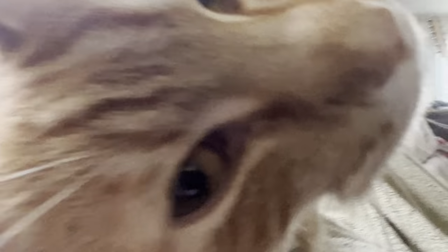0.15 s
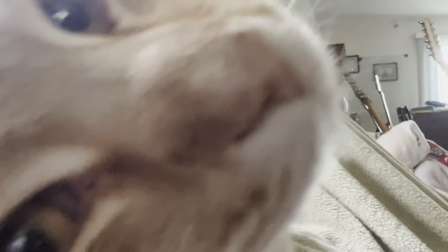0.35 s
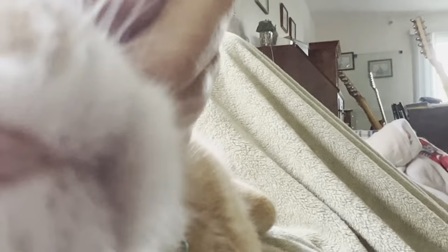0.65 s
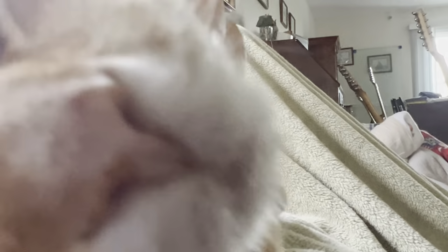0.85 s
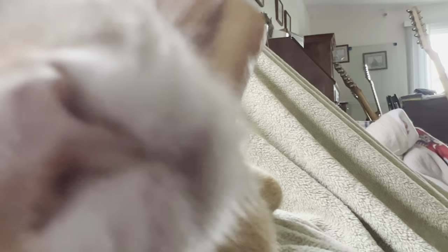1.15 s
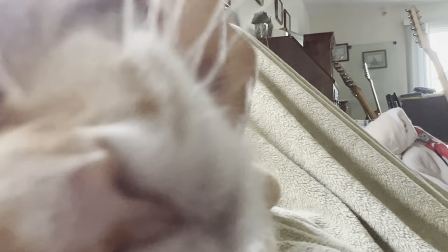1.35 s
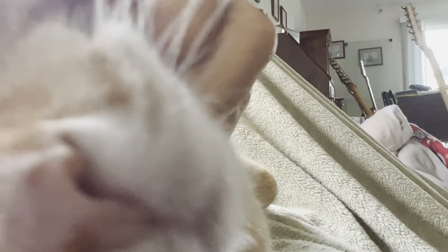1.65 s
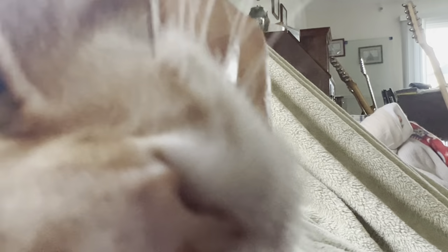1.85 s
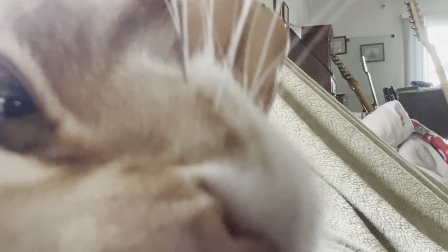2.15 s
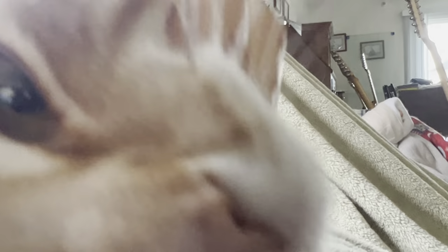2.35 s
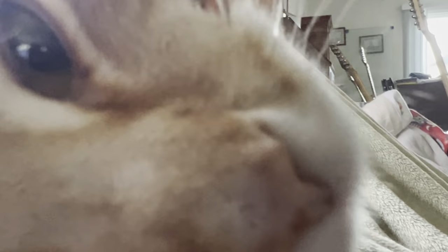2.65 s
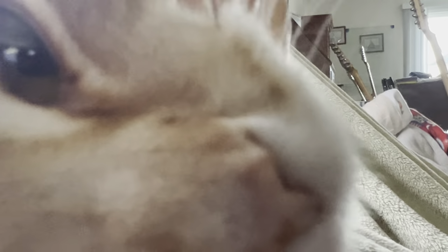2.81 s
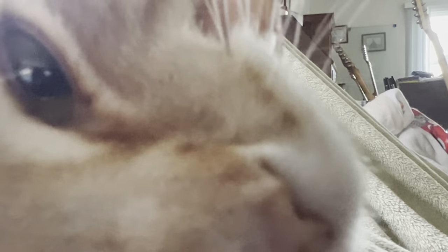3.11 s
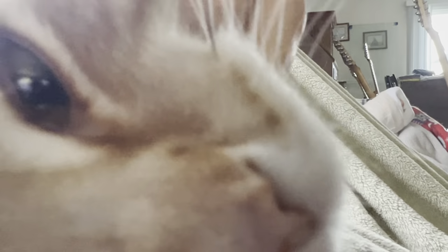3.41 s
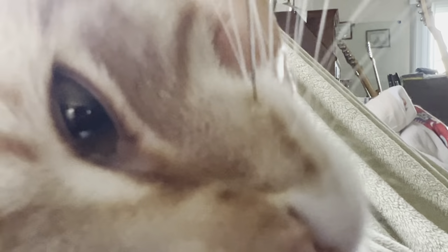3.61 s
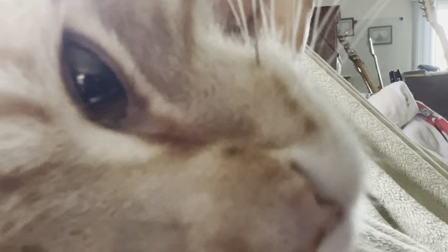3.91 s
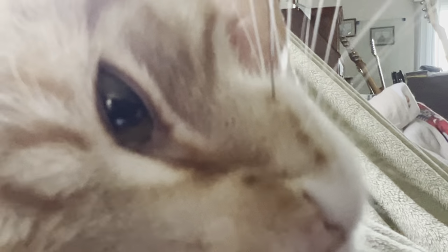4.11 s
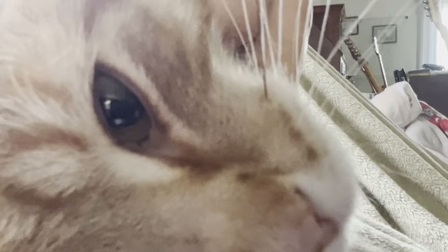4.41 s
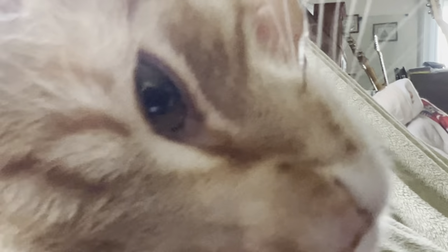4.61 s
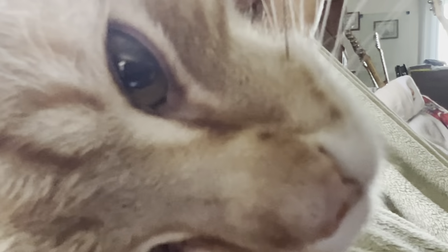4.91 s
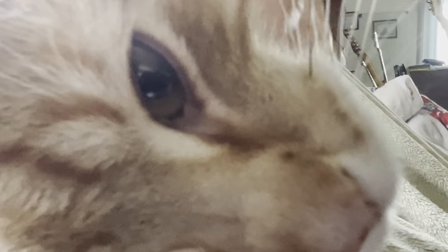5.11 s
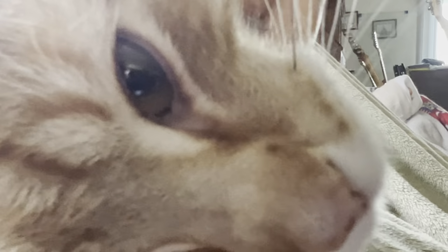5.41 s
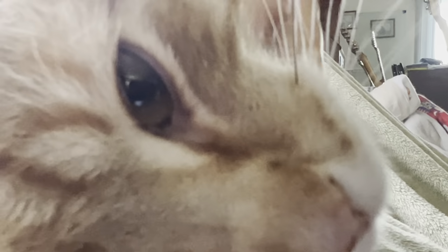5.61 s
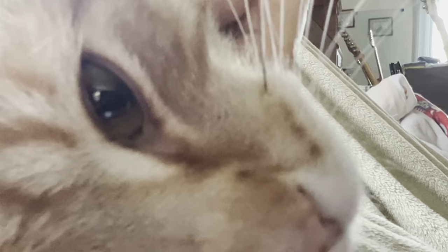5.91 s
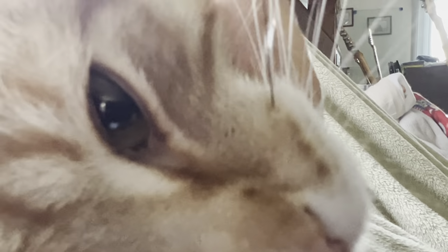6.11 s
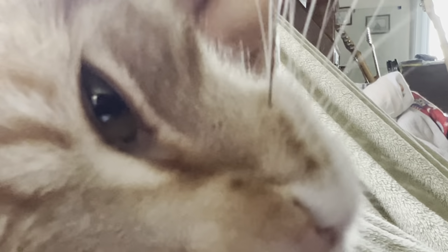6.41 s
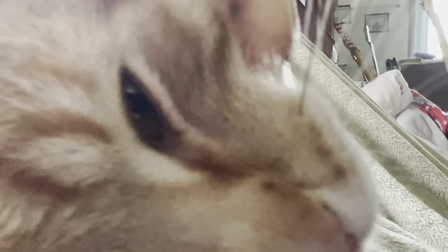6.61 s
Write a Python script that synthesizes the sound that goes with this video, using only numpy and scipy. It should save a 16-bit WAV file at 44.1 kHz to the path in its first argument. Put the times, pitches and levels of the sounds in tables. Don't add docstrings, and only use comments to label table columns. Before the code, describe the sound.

Very close cat purring: a low fluttering throb swells into raspy trills five times, with rapid nostril sniffs and faint room rumble.

```python
import sys
import numpy as np
from scipy import signal
from scipy.fft import rfft, irfft, next_fast_len
from scipy.io import wavfile

SR = 44100
rng = np.random.default_rng(int(sys.argv[2]) if len(sys.argv) > 2 else 0)


def nominal_scale(level):
    x = np.asarray(level, float) / 20
    return 10 ** x


def master(y):
    cut = np.clip(np.atleast_2d(y).T, -1, 1)
    pcm = np.round(cut * 32767)
    wavfile.write(sys.argv[1], SR, pcm.astype(np.int16))


N = 297675
PADDED = next_fast_len(N + 4096)
BINS = np.maximum(np.arange(PADDED // 2 + 1) * SR / PADDED, 1)


def rms_one(x):
    return x / np.sqrt(np.mean(x ** 2) + 1e-20)


def in_time(rows):
    s, *columns = np.transpose(rows)
    return [np.interp(np.arange(N) / SR, s, c) for c in columns]


def at_hz(points, hz):
    points_hz, points_db = np.transpose(points)
    return np.interp(np.log(hz), np.log(points_hz), points_db)


def shaped(x, response):
    return irfft(rfft(x, PADDED) * response, PADDED)[..., :N]


def coloured(spectrum):
    return rms_one(shaped(rng.standard_normal(N), nominal_scale(at_hz(spectrum, BINS)) * (BINS > 20)))


def drift(rate_hz):
    return rms_one(shaped(rng.standard_normal(N), 1 / (1 + (BINS / rate_hz) ** 2)))


def resonance(x, hz, width_hz):
    r = np.exp(-np.pi * width_hz / SR)
    poles = [1, -2 * r * np.cos(2 * np.pi * hz / SR), r * r]
    return signal.lfilter(np.array([1, 0, -1]) * (1 - r * r) / 2, poles, x + 1e-18)


def gliding(x, hz, width_hz):
    carrier = np.exp(2j * np.pi * np.cumsum(hz) / SR)
    r = np.exp(-np.pi * width_hz / SR)
    return 2 * np.real(carrier * signal.lfilter([(1 - r) ** 2], [1, -2 * r, r * r], x / carrier))


def ports(x, tilt):
    # (frequency [Hz], left phase lead [rad])
    port_lead = [(0, 0), (120, .25), (350, .42), (1300, .55), (4000, .5), (6500, 0), (8400, -1.3),
                 (10000, -3.14), (13400, -6.28), (15700, -8.7)]
    lead_rad = np.interp(BINS, *np.transpose(port_lead))
    half = nominal_scale(at_hz(tilt, BINS) / 2) * np.exp(.5j * lead_rad)
    return shaped(x, np.array([half, 1 / half]))


def diffuse(spectrum):
    # (frequency [Hz], side minus mid [dB])
    side_spread = [(60, -13.5), (110, -17), (200, -14.5), (380, -7), (700, 0), (1290, -2.5), (2380, -2),
                   (4400, 2.5), (8120, 6), (15000, -14.5)]
    # (frequency [Hz], left minus right [dB])
    diffuse_tilt = [(60, 2), (200, 3), (500, 3), (1200, .5), (4000, 2.5), (12000, .1)]
    side = shaped(coloured(spectrum), nominal_scale(at_hz(side_spread, BINS)))
    return ports(coloured(spectrum), diffuse_tilt) + side * [[1], [-1]]


def folds():
    # (frequency [Hz], level [dB])
    overtone_levels = [(520, -16.5), (600, -9), (720, -1.5), (880, -4), (1100, -6), (1300, -18),
                       (1550, -69), (2050, -37), (2600, -44.5)]
    # (frequency [Hz], level [dB])
    nasal_passage = [(150, 16), (220, -2.5), (330, 2), (450, -3.5), (520, -16), (600, -45)]
    # (frequency [Hz], density [dB/Hz])
    rasp_spectrum = [(140, -23), (200, 0.5), (270, 9), (420, 7), (520, -17), (750, -3), (1150, -22.5),
                     (1450, -66), (2100, -52)]
    tail_ms, taut_hz, open_spread, longest_open_ms, rasp_db = 8.5, 410, .12, 22.5, -9
    low, high, puffs = np.zeros((3, N))
    wobble, shake, rasp, flutters = drift(100), drift(160), coloured(rasp_spectrum), throbs()
    chance = rng.standard_normal((len(flutters), 9))
    for (s, peak_db, open_ms, early_hz, late_hz, over_db), luck in zip(flutters, chance):
        open_ms = min(open_ms * np.exp(open_spread * luck[0]), longest_open_ms)
        shut = open_ms + 3.21
        end = shut + tail_ms
        ms = np.arange(round(end * SR / 1000)) * 1000 / SR
        start = round((s - .004) * SR)
        at = slice(start, start + len(ms))
        u = np.clip(ms / shut, 0, 1)
        slack = np.clip((taut_hz - min(early_hz, late_hz)) / 150, .08, 1)
        path_hz = [early_hz + 0.55 * max(taut_hz - early_hz, 0), early_hz * (1 - 0.2335 * slack),
                   late_hz * 1.086, late_hz * 0.64]
        hz = np.interp(ms, [0, 0.32 * shut, shut, end], path_hz) * (1 + 0.054 * slack * wobble[at])
        turn = 2 * np.pi * np.cumsum(hz) / SR
        soft = np.clip(np.minimum(ms, ms[-1] - ms) / 1.5, 0, 1)
        force = soft * nominal_scale(peak_db + 0.86 * slack * shake[at])
        body = force * np.interp(ms, [0, 0.17 * shut, .7 * shut, shut, shut + .5 * tail_ms, end],
                                 [0.26, 0.61, 1, 0.61, 0.29, 0.22])
        first = nominal_scale(at_hz(nasal_passage, hz)) * np.sin(turn)
        second = nominal_scale(at_hz(nasal_passage, 2 * hz) - 10.5) * np.sin(2 * turn - 1.5)
        low[at] += body * (first + second)
        snap = force * np.sin(np.pi * u ** .8) ** .5
        for k in range(2, 9):
            level_db = over_db - 3.0 + 0.32 * luck[k] + at_hz(overtone_levels, k * hz)
            high[at] += snap * nominal_scale(level_db) * np.sin(k * (turn - .4))
        high[at] += snap * nominal_scale(rasp_db) * slack ** 2 * min(open_ms / 20, 1) * rasp[at]
        puffs[at] += np.sin(np.pi * u) * np.exp(3 * (np.cos(turn) - 1))
    ringing = nominal_scale(-3.0) * low + nominal_scale(-9.5) * resonance(low, 430, 123)
    return ringing + high, puffs


def throbs():
    # (first throb [s], last throb [s], mid-swell hurry [ms], slack opening [ms],
    # overtone trim [dB])
    swells = [
        (0.366, 0.529, 1, 11, -7),
        (1.597, 1.885, 1.5, 15.9, 0.1),
        (2.853, 3.286, 4.5, 19, -4),
        (4.437, 4.761, -0.5, 13, -0.5),
        (5.939, 6.37, 6, 17, -0.5),
    ]
    # (time [s], peak level [dB], early pitch [Hz], late pitch [Hz])
    efforts = [
        [(.364, -32.5, 430, 424), (.526, -34.5, 436, 452)],
        [(1.597, -34, 388, 390), (1.628, -30, 386, 415.4), (1.66, -28, 296, 360), (1.74, -27, 346, 399),
         (1.788, -29, 328, 363), (1.82, -30.5, 387, 404), (1.885, -35, 466, 441)],
        [(2.852, -26.5, 389, 392), (2.88, -26.5, 272.3, 376), (2.947, -24.5, 247.9, 353),
         (3.067, -26.5, 260.8, 333), (3.159, -27, 256, 300), (3.19, -29, 277, 225),
         (3.287, -30.5, 276.6, 249.4)],
        [(4.434, -42, 457, 490), (4.5, -33, 362.5, 391), (4.6, -31.5, 321, 341), (4.632, -35.5, 411, 403),
         (4.695, -34, 356, 387), (4.727, -36, 422, 430), (4.761, -38, 450, 430)],
        [(5.94, -32, 381.2, 384), (5.967, -30, 281.3, 349), (6.03, -32.5, 258, 373), (6.09, -32, 250, 330),
         (6.13, -32, 275, 350), (6.21, -32, 272, 309), (6.3, -34, 252, 323), (6.371, -34.5, 330, 326)],
    ]
    run_ons = [2.975, 3.005, 3.067, 3.098, 5.968, 6.06]
    throb_s, rest_hz, sag_span_hz = .0316, 446, 166.3
    taut_open_ms, run_on_ms, run_on_db = 8.92, 7, -0.5
    tiring_share = .35
    taut_over_db, sag_over_db, glide_over_db = -5, -4.5, -4
    rows = []
    for (first, last, hurry_ms, slack_ms, trim_db), effort in zip(swells, efforts):
        u = np.linspace(0, 1, round((last - first) / throb_s) + 1)
        s = first + u * (last - first) - hurry_ms / 1000 * np.sin(np.pi * u)
        knots, *columns = np.transpose(effort)
        peak_db, early_hz, late_hz = [np.interp(s, knots, c) for c in columns]
        sag = np.clip((rest_hz - early_hz) / sag_span_hz, 0, 1)
        runs_on = np.abs(s[:, None] - run_ons).min(axis=1) < throb_s / 2
        open_ms = taut_open_ms + (slack_ms - taut_open_ms) * sag
        open_ms = open_ms * (1 - tiring_share * sag * u ** 3) + run_on_ms * runs_on
        over_db = taut_over_db + (sag_over_db + trim_db) * sag + glide_over_db * (late_hz - early_hz) / 100
        rows += zip(s, peak_db + run_on_db * runs_on, open_ms, early_hz, late_hz, over_db)
    return rows


def chest(throb, order_db):
    # (multiple of throb rate [1], level [dB])
    chest_orders = [(1, -11), (2, 0), (3, -11), (4, -13), (5, -14.5)]
    return sum(nominal_scale(order_db + 3.0 + db + 1.0 * drift(7.2)) * np.sin(k * throb) for k, db in chest_orders)


def purring():
    # (start [s], end [s], throb rate [Hz], second-order level [dB],
    # body rumble [dB])
    purrs = [(-.1, 0.11, 30.4, -56, -64), (0.3, 0.663, 30.23, -62.5, -53.5),
             (0.939, 1.241, 28.55, -50.5, -61), (1.507, 1.949, 30.27, -49, -52),
             (2.118, 2.321, 28.46, -55.5, -60), (2.406, 2.622, 28.84, -53.5, -57.5),
             (2.828, 3.24, 32.99, -42, -47.5), (3.541, 4.096, 28.46, -56.5, -58.5),
             (4.443, 4.774, 30.03, -53.5, -53), (4.928, 5.62, 29, -58.5, -60.5),
             (5.854, 6.431, 32.76, -50, -53.5), (6.474, 6.667, 28.3, -65.5, -62)]
    swing_s, arch_db = 0.0896, 5
    pause_hz, pause_db, pause_rumble_db = 30.6, -64.5, -61.5
    t = np.arange(N) / SR
    rate_hz, order_db, rumble_db = np.outer([pause_hz, pause_db, pause_rumble_db], np.ones(N))
    for start, end, hz, db, body_db in purrs:
        on = np.clip(np.minimum(t - start, end - t) / swing_s + 1, 0, 1)
        edge_db = arch_db * np.interp((t - start) / (end - start), [0, 0.5, 1], [1, 0, 1]) ** 2
        rate_hz = rate_hz + on * (hz - pause_hz)
        order_db = order_db + on * (db - edge_db - pause_db)
        arched_db = np.maximum(body_db - edge_db, min(body_db, pause_rumble_db))
        rumble_db = rumble_db + on * (arched_db - pause_rumble_db)
    return rate_hz, order_db, rumble_db


def throat_air(whistle_hz, upper_hz, whistle_db, air_db, puffs, throb):
    # (resonance [Hz], width [Hz], level [dB])
    throat = [(2030, 420, 4.5), (5160, 720, -4.5), (7250, 1640, -3.5)]
    breath = rng.standard_normal(N) * (0.53 + 1.66 * puffs)
    steady = sum((-1) ** k * nominal_scale(db) * resonance(breath, hz, width)
                 for k, (hz, width, db) in enumerate(throat))
    air = rms_one(steady + nominal_scale(2.5) * gliding(breath, upper_hz, 470))
    pulsed = rng.standard_normal(N) * np.exp(.8 * np.cos(throb))
    whistle = gliding(pulsed, whistle_hz, 380)
    return nominal_scale(air_db - 10) * air + nominal_scale(whistle_db - 10) * rms_one(whistle)


def passage():
    # (opens [s], lowest whistle [s], closes [s], opening pitch [Hz],
    # whistle level [dB])
    passages = [
        (0.312, .4, 0.69, 3000, -70.5),
        (1.58, 1.74, 1.91, 3340, -67.5),
        (2.872, 3.222, 3.27, 3330, -67),
        (4.442, 4.63, 4.79, 3440, -75),
        (5.912, 6.192, 6.45, 3220, -71.5),
    ]
    opening_s, closing_s, shut_db, fade_db = .07, 0.086, -100, 4.5
    sag_s, lowest_hz, recover_hz_per_s = 0.18, 2924, 1200
    air_opening_s, air_closing_s, air_shut_db, air_over_db = 0.18, 0.023, -93, 4.5
    pitch, level, air = [], [], []
    for opens, lowest, closes, hz, db in passages:
        shut = closes + closing_s
        pitch += [(opens, hz), (max(opens, lowest - sag_s), hz), (lowest, lowest_hz),
                  (shut, lowest_hz + recover_hz_per_s * (shut - lowest))]
        level += [(opens - opening_s, shut_db), (opens, db), (lowest, db),
                  (closes, db - fade_db), (shut, shut_db)]
        air += [(opens - air_opening_s, air_shut_db), (opens + 0.054, db + air_over_db),
                (closes, db + air_over_db), (closes + air_closing_s, air_shut_db)]
    hz, = in_time(pitch)
    upper_hz = 3810 + 0.75 * (hz - lowest_hz)
    return hz, upper_hz, in_time(level)[0], in_time(air)[0]


def pops():
    # (time [s], peak level [dB], pitch [Hz], t60 [s])
    fold_pops = [
        (0.310, -38, 275, 0.021),
        (2.756, -53.5, 673, 0.039),
        (2.786, -51, 765, 0.025),
        (2.818, -35.5, 660, 0.0054),
        (2.833, -27.5, 223, 0.019),
        (3.313, -50, 310, 0.036),
        (4.402, -63, 528, 0.031),
        (5.872, -61.5, 698, 0.028),
        (5.902, -48.5, 631, 0.01),
        (5.917, -45, 266, 0.059),
    ]
    out = np.zeros(N)
    for s, peak_db, hz, t60 in fold_pops:
        t = np.arange(round(1.2 * t60 * SR)) / SR
        decay = nominal_scale(peak_db + 8.5 - 60 * t / t60)
        knock = np.sin(2 * np.pi * hz * t) * decay * (1 - np.exp(-t * hz * 2))
        out[round(s * SR):][:len(t)] += knock
    return out


def sniffs(flow_db):
    # (frequency [Hz], density [dB/Hz])
    nostril = [(900, -11.5), (2000, -8.5), (4000, -8.5), (6500, -8.5), (8500, -3), (9500, -6.5),
               (10500, -3.5), (11500, 1), (13000, -3), (15500, -2.5)]
    return nominal_scale(flow_db + 5.5 + 0.77 * drift(25)) * coloured(nostril)


def nostril_flow(air_db):
    # (start [s], crest [s], crest level [dB])
    sniff_strokes = [(.15, .21, -80.5), (0.384, 0.593, -68.5), (0.695, 0.795, -72), (.92, 0.965, -69.5),
                     (1.097, 1.216, -71), (1.311, 1.377, -69), (1.69, 1.783, -72.5), (1.932, 2.01, -68.5),
                     (2.13, 2.231, -72.5), (2.312, 2.376, -69), (2.517, 2.602, -75), (2.68, 2.862, -68.5),
                     (2.99, 3.083, -71), (3.22, 3.297, -67.5), (3.462, 3.53, -70), (3.647, 3.749, -71),
                     (3.932, 4.008, -74.5), (4.178, 4.288, -75.5), (4.432, 4.55, -75),
                     (4.665, 4.806, -73.5), (4.943, 5.12, -74.5), (5.256, 5.337, -73.5),
                     (5.522, 5.615, -79.5), (5.776, 5.816, -75.5), (5.976, 6.067, -70.5),
                     (6.19, 6.372, -67.5), (6.497, 6.632, -70.5)]
    hold_s, hold_loss_db, still_db, leak_db, last_stop_s = 0.043, 1.5, -93, -21.5, 6.78
    start, crest, crest_db = np.transpose(sniff_strokes)
    rest_db = np.maximum(still_db, air_db[(start * SR).astype(int)] + leak_db)
    s = np.append(np.transpose([start, crest, crest + hold_s]), last_stop_s)
    turning_db = np.append(np.transpose([rest_db, crest_db, crest_db - hold_loss_db]), still_db)
    place = np.interp(np.arange(N) / SR, s, np.arange(len(s)))
    eased = place - 0.37 * np.sin(2 * np.pi * place) / (2 * np.pi)
    return np.interp(eased, np.arange(len(s)), turning_db)


def ticks():
    # (time [s], peak level [dB], brightness [Hz])
    whisker_ticks = [
        (2.3528, -46, 2180),
        (2.7677, -48, 1670),
        (3.267, -47, 1894),
    ]
    out = np.zeros(N)
    t = np.arange(200) / SR
    for s, peak_db, hz in whisker_ticks:
        snap = np.sin(2 * np.pi * hz * t) + 0.12 * np.sin(2 * np.pi * 2.44 * hz * t)
        out[round(s * SR):][:200] += nominal_scale(peak_db) * np.exp(-1.3 * hz * t) * snap
    return out


def body_rumble(rumble_db, throb):
    # (frequency [Hz], density [dB/Hz])
    body_spectrum = [(20, -6.5), (35, -2.5), (70, -1), (140, -4.5), (220, -8), (400, -19), (700, -29),
                     (1400, -31.5), (2200, -90)]
    return nominal_scale(rumble_db + 2.5 + 2.24 * drift(9.4) + 1.1 * np.cos(throb)) * diffuse(body_spectrum)


def room_rumble():
    # (frequency [Hz], density [dB/Hz])
    room_spectrum = [(13, -20), (22, -2), (53, 0), (82, 2), (200, -9), (352, -13), (700, -35.5),
                     (1200, -31.5), (1750, -33), (2200, -39), (8260, -57), (10000, -68), (11500, -62),
                     (15500, -54)]
    return nominal_scale(-60.5) * diffuse(room_spectrum)


def scene():
    # (frequency [Hz], left minus right [dB])
    voice_tilt = [(60, -.3), (110, .6), (200, 1.8), (400, 2), (700, 8), (1290, 7), (2380, 4.5), (4400, 3.5),
                  (8120, 1), (15000, 0)]
    # (frequency [Hz], left minus right [dB])
    nose_tilt = [(900, -5.5), (3000, 7), (6000, 3.5), (9000, 1), (15000, -0.5)]
    rate_hz, order_db, rumble_db = purring()
    *whistle, air_db = passage()
    flow_db = nostril_flow(air_db)
    air_db = np.maximum(air_db, flow_db - 16)
    throb = 2 * np.pi * np.cumsum(rate_hz * (1 + 0.013 * drift(6.05))) / SR
    voice, puffs = folds()
    voice = voice + chest(throb, order_db) + throat_air(*whistle, air_db, puffs, throb)
    near = ports(voice + pops() + ticks(), voice_tilt)
    sniff = ports(sniffs(flow_db), nose_tilt)
    return near + sniff + body_rumble(rumble_db, throb) + room_rumble()


def low_pass(x):
    return signal.sosfilt(signal.butter(12, 15680, fs=SR, output="sos"), x)


def record(dry):
    return low_pass(dry)


dry = scene()
out = record(dry)
master(out)
```